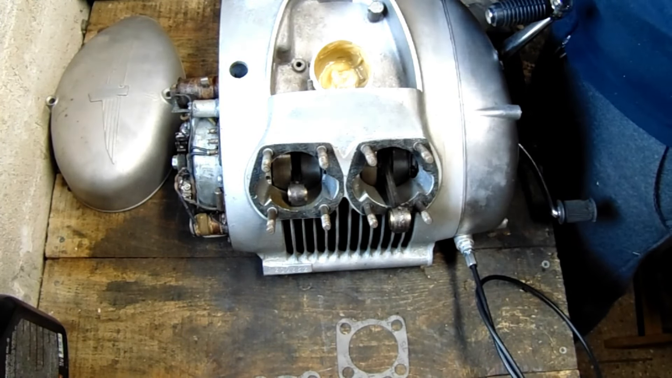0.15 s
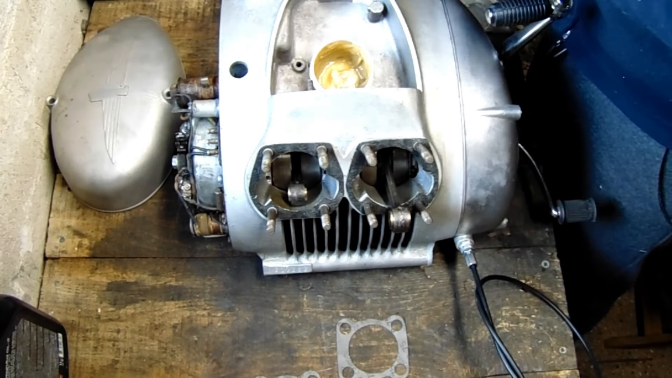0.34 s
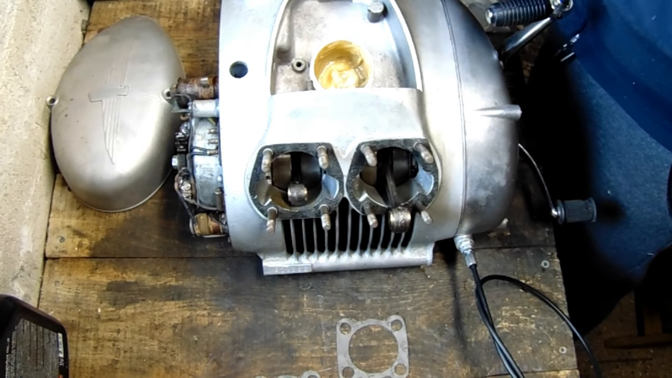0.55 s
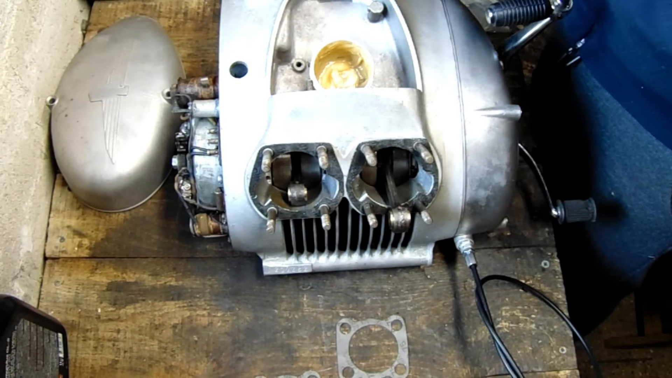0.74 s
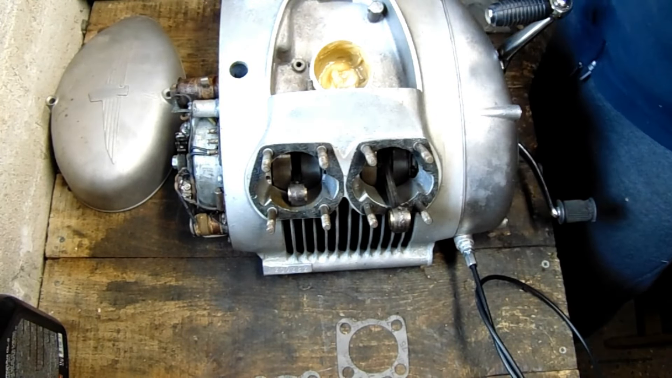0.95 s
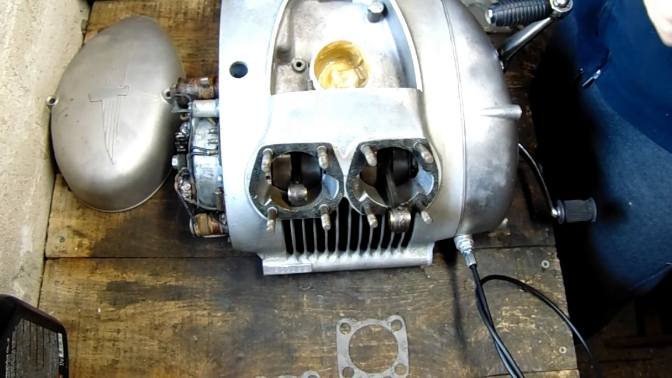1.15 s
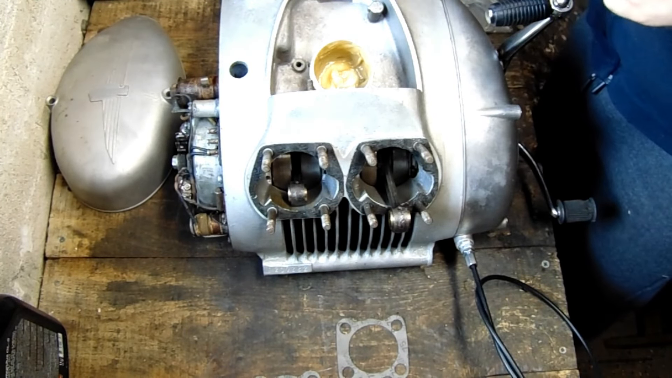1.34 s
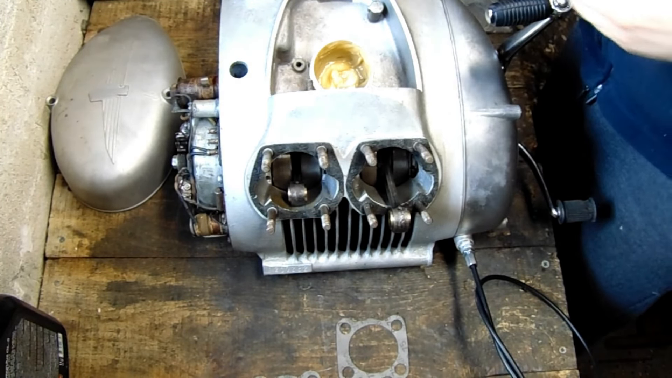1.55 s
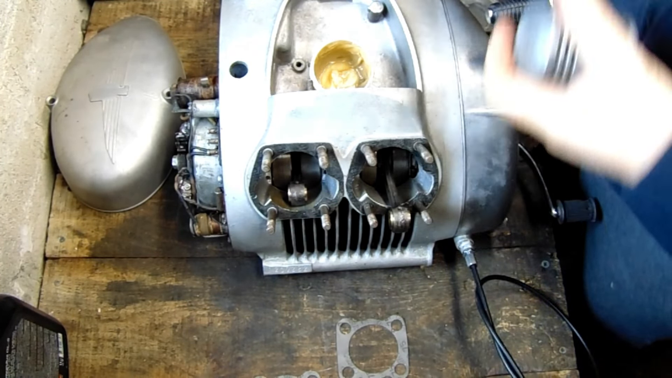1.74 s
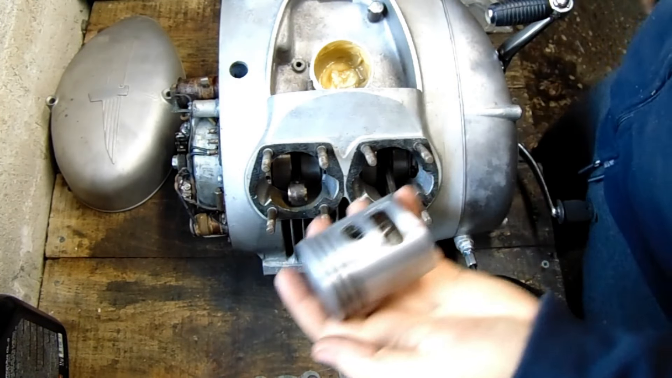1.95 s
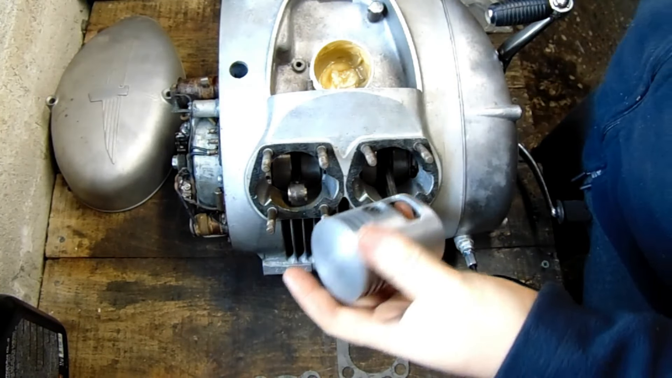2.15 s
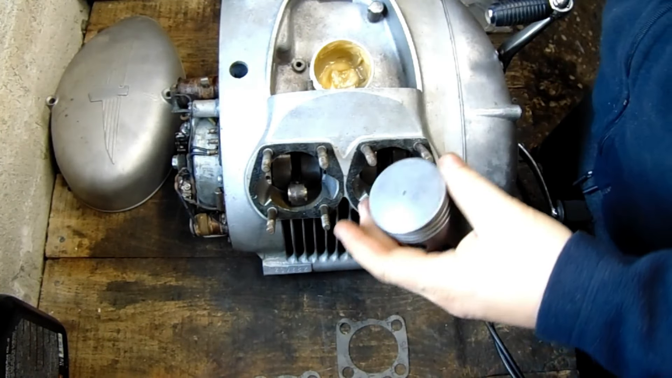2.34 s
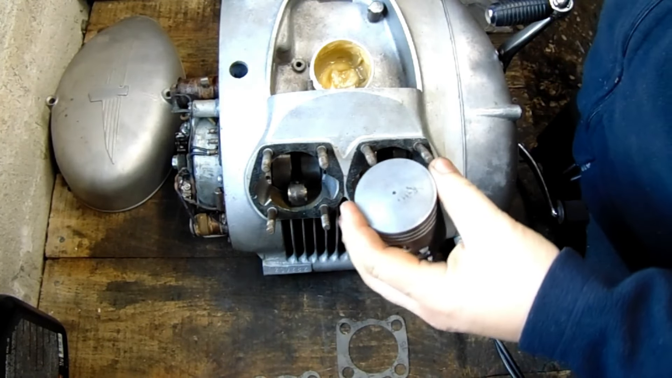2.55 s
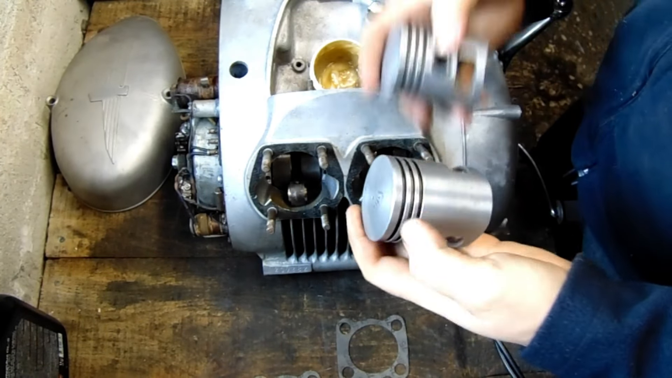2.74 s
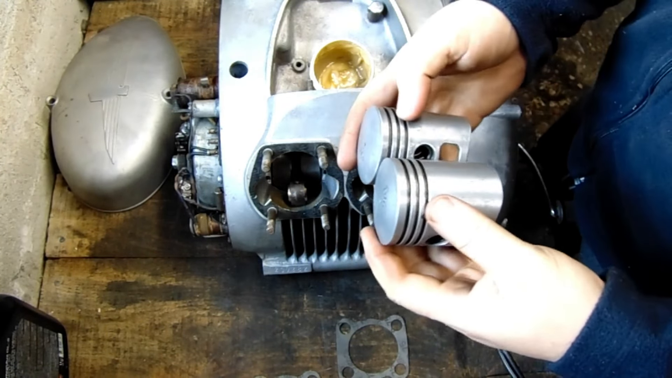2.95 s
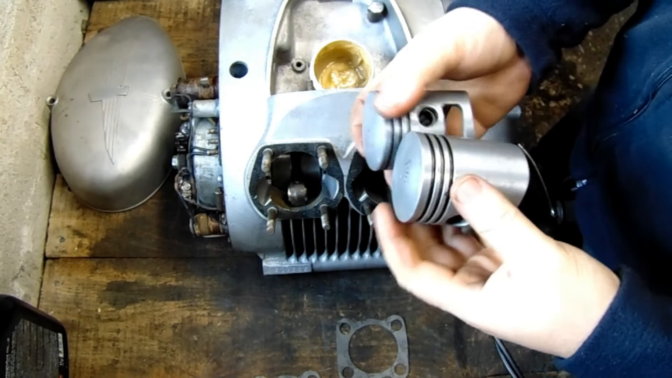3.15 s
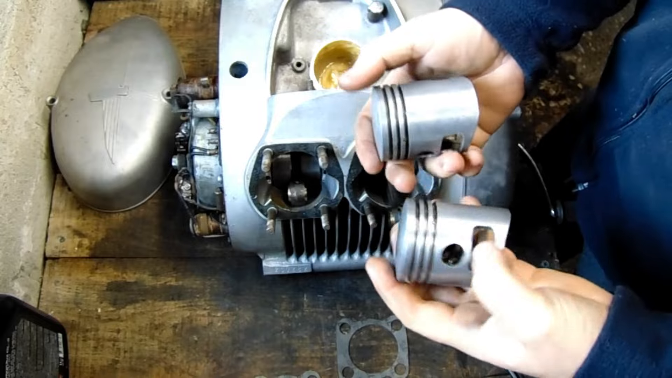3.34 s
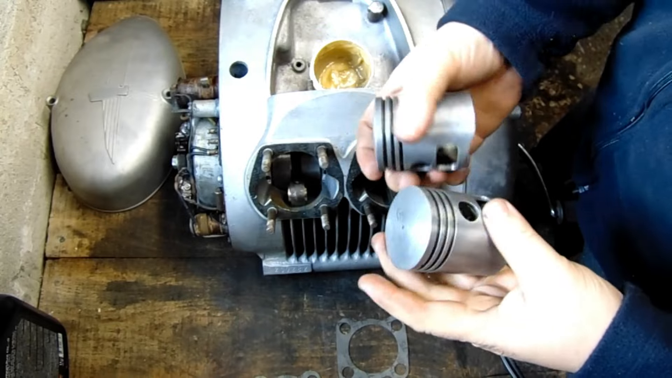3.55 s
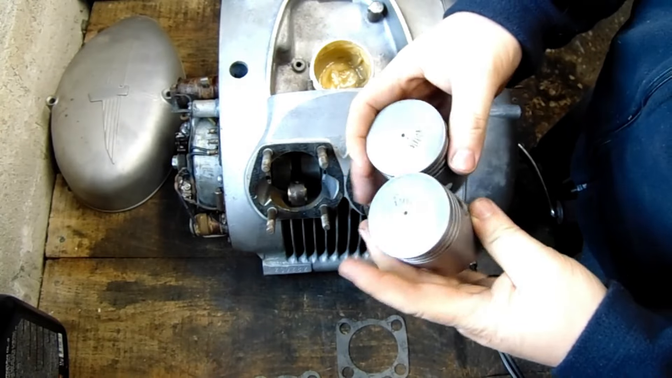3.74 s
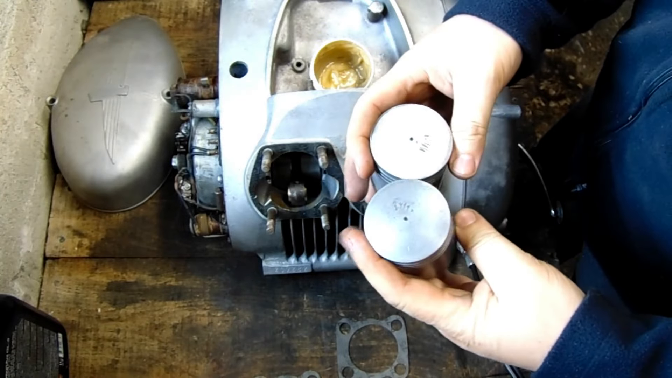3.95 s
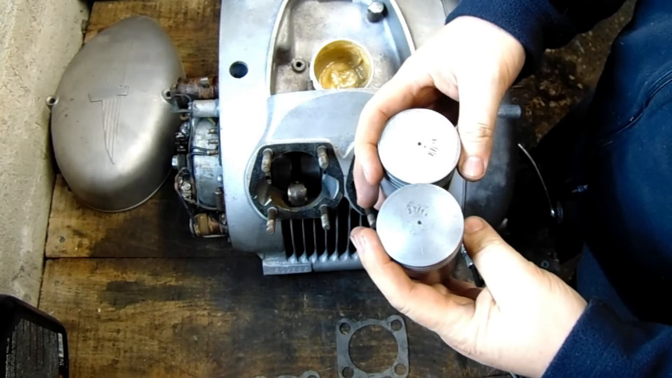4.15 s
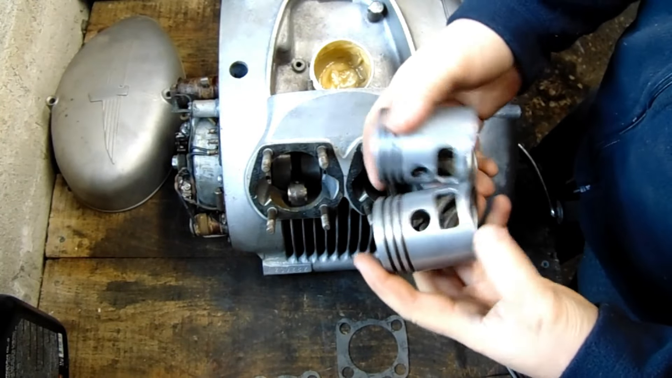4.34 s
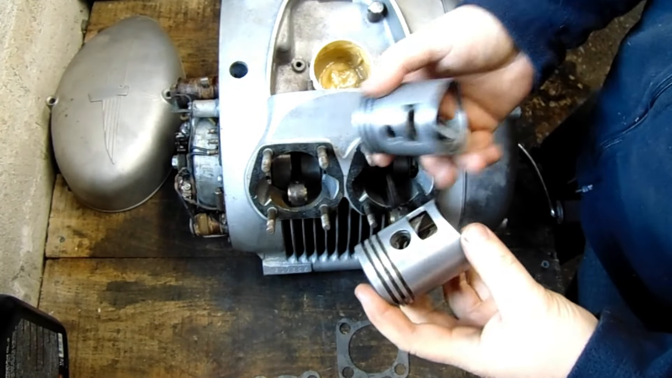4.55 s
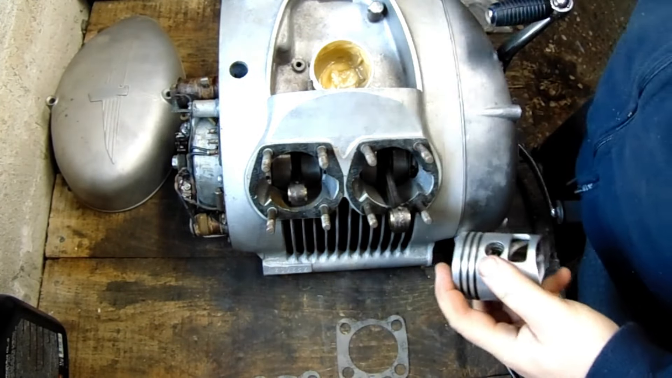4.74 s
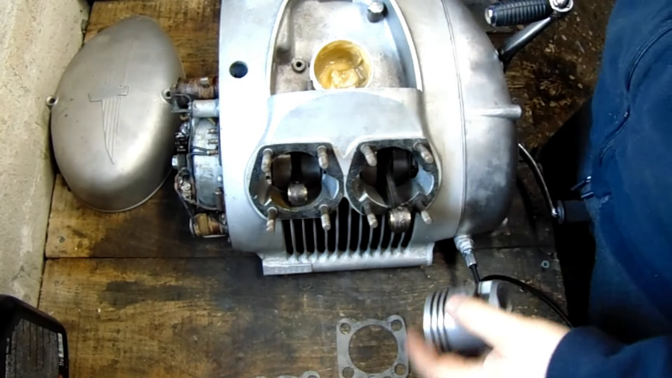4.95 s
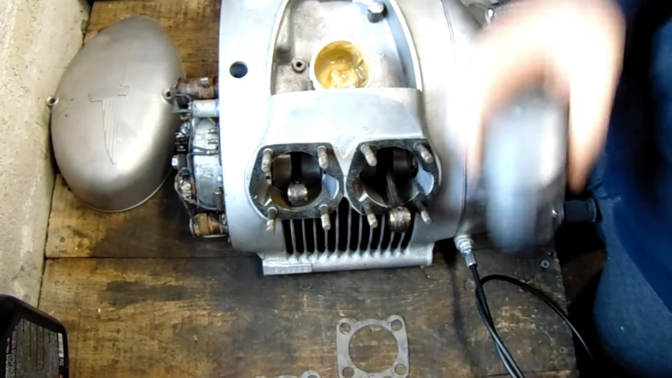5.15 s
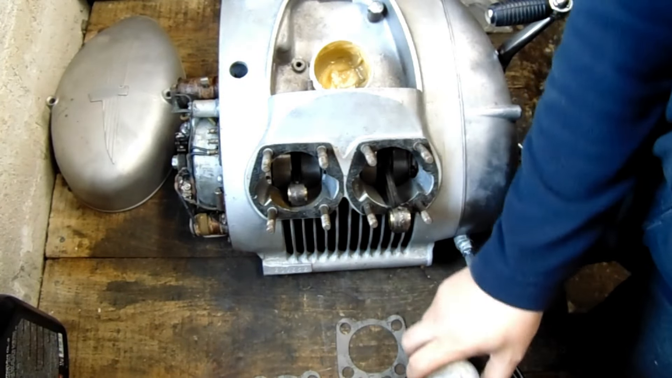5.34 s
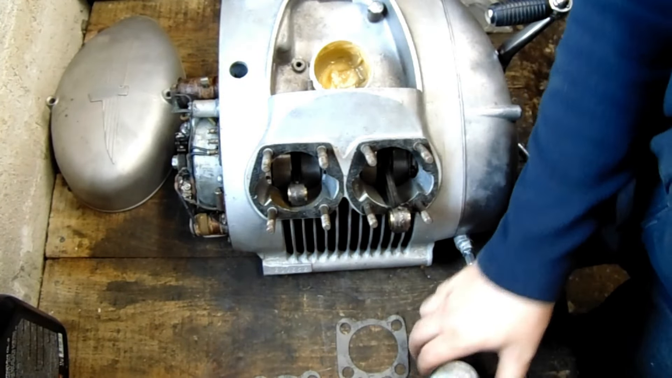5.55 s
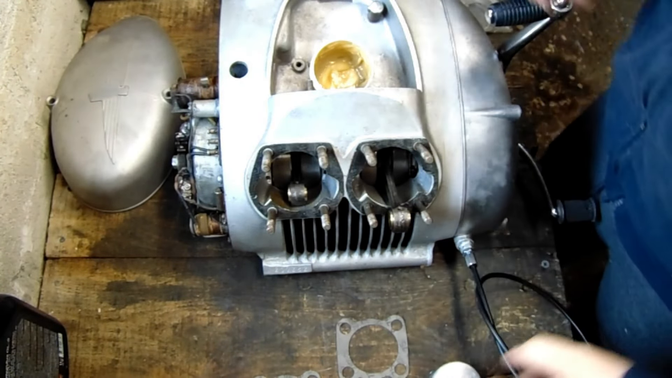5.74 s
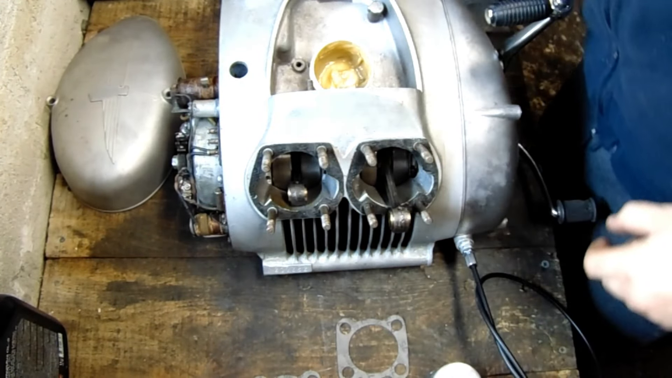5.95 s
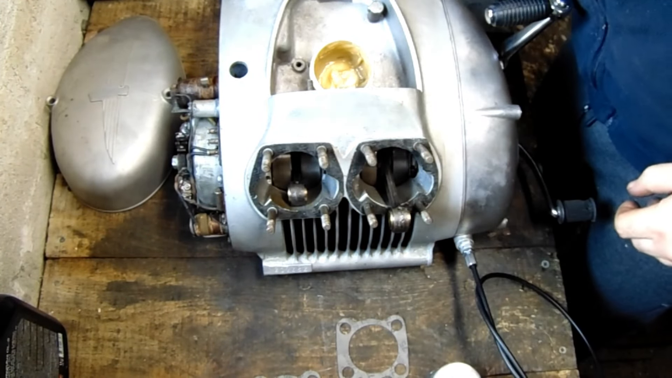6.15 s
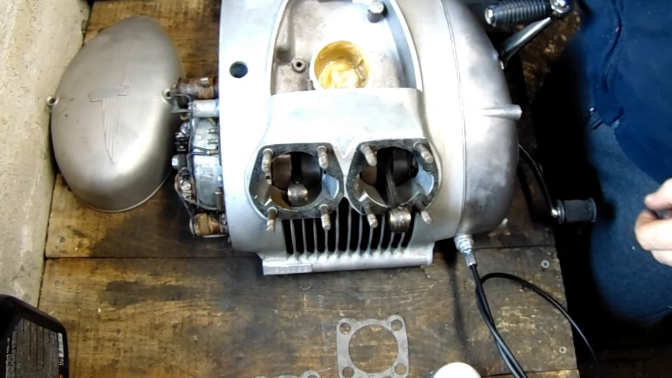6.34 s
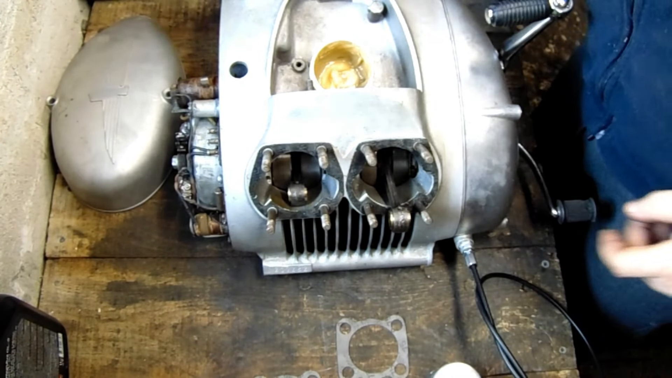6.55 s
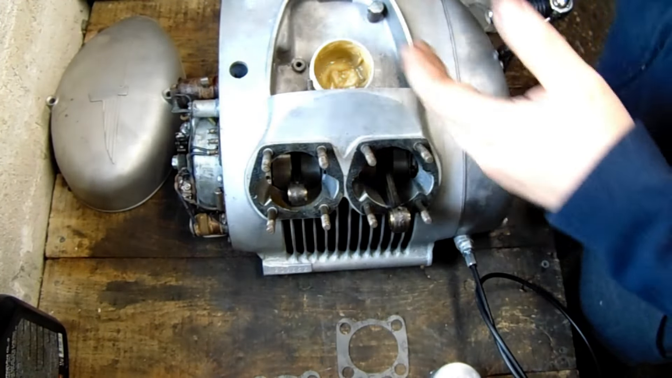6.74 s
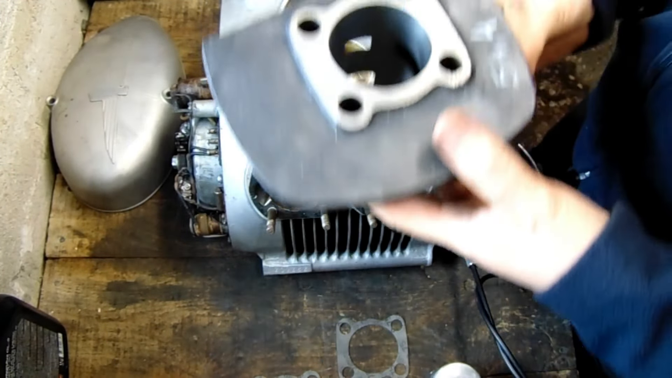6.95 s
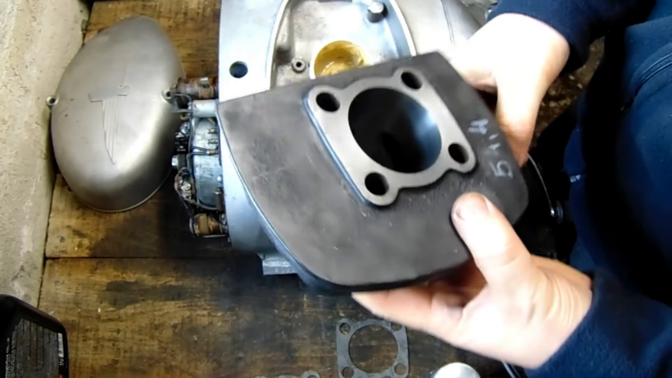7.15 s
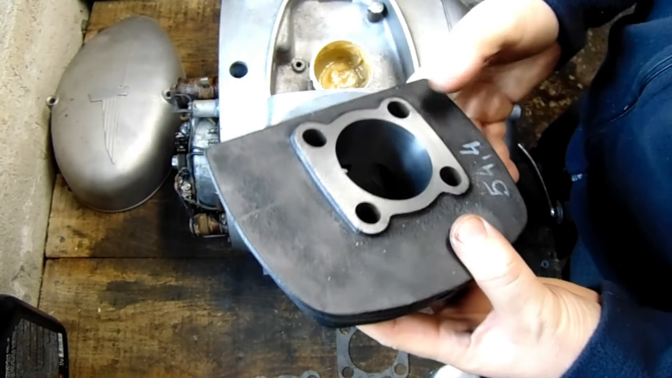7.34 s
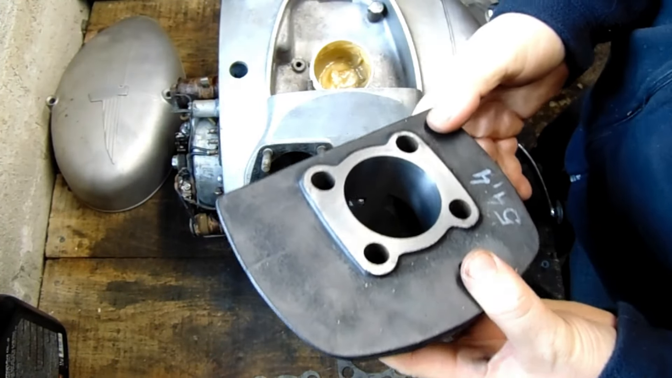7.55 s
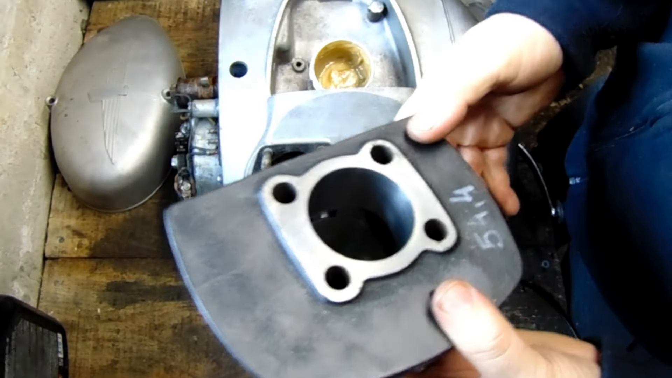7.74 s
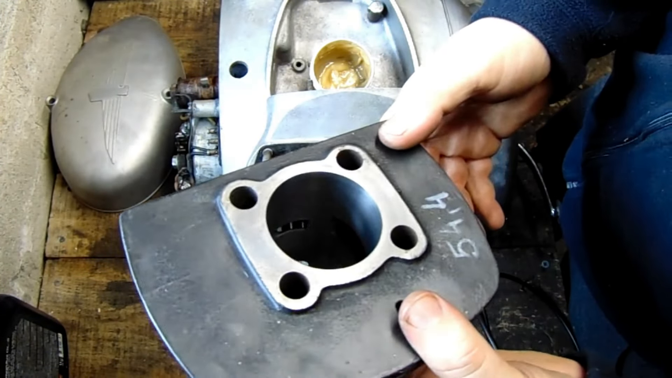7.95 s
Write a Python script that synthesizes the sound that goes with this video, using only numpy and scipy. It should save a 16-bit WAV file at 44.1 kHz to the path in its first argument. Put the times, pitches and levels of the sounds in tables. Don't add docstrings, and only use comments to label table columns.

```python
import sys
import numpy as np
from scipy import signal
from scipy.fft import rfft, irfft, next_fast_len
from scipy.io import wavfile
from scipy.ndimage import uniform_filter1d, map_coordinates

SR = 44100
rng = np.random.default_rng(int(sys.argv[2]) if len(sys.argv) > 2 else 0)


def store_wav(level_fs):
    pcm = np.round(np.clip(np.atleast_2d(level_fs), -1, 1) * 32767)
    wavfile.write(sys.argv[1], SR, pcm.T.astype(np.int16))


def boost_factor(decibels):
    exponent = np.asarray(decibels, float) / 20
    return 10 ** exponent


N = 352359


def unit(x):
    return x / np.sqrt(np.mean(x ** 2) + 1e-20)


def wobble(rate):
    knots = rng.standard_normal(int(N * rate / SR) + 4)
    return map_coordinates(knots, [np.arange(N) * rate / SR])


def filtered(x, response):
    m = next_fast_len(len(x) + 8192)
    return irfft(rfft(x, m) * response(np.fft.rfftfreq(m, 1 / SR)), m)[:len(x)]


def resonances(modes):
    def response(f):
        return sum((-1) ** k * boost_factor(db) * 1j * f * width / (hz * hz - f * f + 1j * f * width)
                   for k, (hz, width, db) in enumerate(modes))
    return response


def ring(modes, t, scatter_db, rough=0):
    total = 0
    for hz, db, t60 in modes:
        strength_db = db + scatter_db * rng.standard_normal()
        walk = rough * np.cumsum(rng.standard_normal(len(t))) / np.sqrt(SR)
        total = total + boost_factor(strength_db - 60 * t / t60) * np.sin(2 * np.pi * hz * t + walk * 0.038 / t60)
    return total


def add(track, s, sound):
    at = track[round(s * SR):][:len(sound)]
    at += sound[:len(at)]


def strokes(rows, cols, attack_s, swell, release_s):
    gain = np.zeros(N)
    for row in rows:
        start, length = row[:2]
        t = np.arange(round((length + 2 * release_s) * SR)) / SR
        rise = np.minimum(t / (attack_s + swell * length), 1)
        level_db = sum(row[c] for c in cols)
        add(gain, start, rise * boost_factor(level_db - 60 * np.maximum(t - length, 0) / release_s))
    return gain


# [t/s, level/dB]
HISS = [
    (0.0, -63),
    (0.18, -67),
    (0.84, -66),
    (1.4, -66.5),
    (3.85, -67.5),
    (3.96, -72),
    (4.21, -71),
    (4.4, -69),
    (5.32, -66.5),
    (7.99, -68),
]
# [f/Hz, level/dB per Hz]
HISS_COLOUR = [(15, -37), (25, -1.5), (43, -10), (76, -3.5), (200, -10), (406, -11), (1890, -17),
               (14200, -25.5)]
# [t/s, length/s, level/dB]
DRONE = [(.1, 0.2, -74), (.5, 0.31, -71), (1.6, 0.22, -69), (1.85, 0.2, -70), (2.4, 0.37, -73),
         (3.1, 0.32, -75), (3.85, 0.26, -78), (4.4, 0.13, -73.5), (4.85, 0.59, -64.5), (5.6, 0.34, -75.5),
         (6, 0.22, -72), (6.64, 0.18, -66.5), (6.96, 0.15, -70.5), (7.45, 0.3, -69), (7.86, .2, -67.5)]
# [t/s, length/s, level/dB]
CREAKS = [(.55, 0.34, -81), (.85, 0.156, -69), (1.62, 0.13, -82), (2.2, .4, -77), (2.64, 0.089, -74),
          (3.1, 0.36, -77), (4.22, 0.52, -75), (4.8, 0.34, -67.5), (5.2, .2, -74.5), (5.5, 0.45, -61.5),
          (6.4, 0.25, -71), (6.95, 0.21, -70.5), (7.22, 0.23, -66.5), (7.5, 0.22, -66.5),
          (7.72, 0.21, -63.5)]


def floor():
    hz, db = np.transpose(HISS_COLOUR)
    hiss = filtered(rng.standard_normal(N), lambda f: boost_factor(np.interp(np.log(f + 1), np.log(hz), db)))
    drone = np.sin(2 * np.pi * np.cumsum(76 + 1.8 * wobble(8.5)) / SR) * boost_factor(1.6 * wobble(4.5))
    rumble = filtered(rng.standard_normal(N), lambda f: resonances([(165, 150, 0)])(f) ** 2)

    def swell(rows, idle_db):
        return boost_factor(idle_db) + strokes(rows, [2], attack_s=0.049, swell=0.24, release_s=.3)

    lows = swell(DRONE, idle_db=-88.0) * unit(drone)
    lows += boost_factor(-4.5) * swell(CREAKS, idle_db=-83.5) * unit(rumble)
    hiss_db = 4 + 0.43 * wobble(12) + np.interp(np.arange(N) / SR, *np.transpose(HISS))
    return boost_factor(hiss_db) * unit(hiss) + lows


# [t/s, length/s, treble level/dB, body level/dB over the treble]
RUSTLE = [(.005, 0.016, -66, 0.5), (.05, 0.076, -60.5, 0.5), (.222, 0.023, -57, -6), (.26, 0.12, -62, -0.5),
          (.47, 0.099, -58, -4.5), (.64, 0.031, -56, -3.5), (.68, 0.062, -68, 3.5), (.775, 0.029, -63, 0),
          (.886, 0.027, -62, 1.5), (.94, 0.073, -58, -2.5), (3.235, 0.015, -72, 2),
          (3.33, 0.089, -69.5, -14), (5.32, 0.083, -70, 0.5), (7.07, 0.032, -67, -2.5),
          (7.24, 0.042, -67.5, -0.5)]


def sleeves():
    grain = boost_factor(0.93 * wobble(300) + wobble(40))
    treble = filtered(rng.standard_normal(N), lambda f: (f / 4000) ** 2 / (1 + (f / 4000) ** 2))
    body = filtered(rng.standard_normal(N), lambda f: f / (f + 500) / (1 + (f / 4500) ** 2))

    def stroke(cols):
        return strokes(RUSTLE, cols, attack_s=0.0044, swell=0.47, release_s=0.22)

    return grain * (boost_factor(2.5) * stroke([2]) * unit(treble) + boost_factor(3.0) * stroke([2, 3]) * unit(body))


# [t/s, length/s, level/dB]
FOCUS = [
    (.236, 0.12, -56),
    (.392, 0.069, -56.5),
    (.474, 0.11, -54.5),
    (2.54, 0.097, -55.5),
    (2.666, 0.16, -57),
    (4.868, 0.13, -56.5),
    (5.012, .22, -57),
    (7.788, 0.15, -58),
]
# [t/s, peak level/dB]
CATCHES = [
    (2.674, -46),
    (2.7, -51),
    (4.967, -40),
    (7.796, -39.5),
    (7.833, -43),
    (7.881, -35),
    (7.912, -37.5),
]
# [f/Hz, width/Hz, level/dB]
SHELL = [(204.5, 29, -3.5), (309, 4.2, 5), (441, 44, -1), (671, 133, -3.5), (904, 41, 0.5), (1200, 63, 0.5),
         (1710, 35, -7), (2110, 130, -19.5)]


def focus():
    turns = np.cumsum(228 * (1 + 0.0599 * wobble(40))) / SR
    teeth = rng.standard_normal(N) * (0.48 + np.cos(np.pi * turns) ** 4) * boost_factor(1.1 * wobble(45))
    whirr = filtered(teeth, resonances(SHELL))
    bright = filtered(whirr, lambda f: (f / (f + 700)) ** 2)
    run = strokes(FOCUS, [2], attack_s=0.0063, swell=0.018, release_s=0.059)
    ticks = [(s, .002, db - 13.0) for s, db in CATCHES]
    catch = strokes(ticks, [2], attack_s=0.00079, swell=0, release_s=0.035)
    return boost_factor(1.5) * run * unit(whirr) + boost_factor(-2.0) * catch * unit(bright)


def brushed(rows):
    out = np.zeros(N)
    for s, hz, db, length, width_hz in rows:
        mode = resonances([(hz, width_hz, 0)])
        rub = filtered(rng.standard_normal(round(length * SR)), lambda f: mode(f) ** 2)
        add(out, s, boost_factor(db) * unit(rub) * np.hanning(len(rub)) ** 1.2)
    return out


# [t/s, f/Hz, level/dB, length/s, width/Hz]
BUMPS = [
    (0.477, 880, -49, 0.009, 580),
    (4.96, 1140, -72, 0.017, 600),
    (0.715, 680, -61, 0.056, 120),
    (1.259, 100, -57, 0.098, 9),
    (1.519, 550, -60.5, 0.049, 140),
    (2.523, 532, -45.5, 0.039, 160),
    (5.53, 707, -52.5, 0.049, 900),
    (5.783, 227, -58.5, 0.026, 120),
    (6.599, 1200, -61, 0.042, 1120),
]


def bumps():
    return brushed(BUMPS)


# [t/s, peak level/dB, t60/s, tilt/dB an octave]
SCUFFS = [(1.2544, -41.5, 0.14, -3.5), (1.344, -46.5, 0.15, 4), (1.527, -54, 0.075, -3),
          (1.8123, -45, 0.063, -1.5), (2.2898, -54.5, 0.092, -3.5), (2.413, -53.5, 0.073, -3),
          (2.5329, -46.5, 0.075, -6), (2.8153, -57.5, 0.079, -8), (3.679, -54, 0.11, 2),
          (5.8645, -52, 0.061, -2), (6.6594, -57.5, 0.15, -5), (6.7414, -51.5, 0.046, -2.5),
          (6.997, -50.5, 0.087, -1), (7.657, -46.5, 0.06, -2.5)]


def scuffs():
    out, t = np.zeros(N), np.arange(SR // 5) / SR
    for s, db, t60, tilt_db in SCUFFS:
        puff = filtered(rng.standard_normal(len(t)),
                        lambda f: boost_factor(tilt_db * np.log2((f + 400) / 8000)) * f / (f + 400))
        soft_edge = 1 - np.exp(-(t / (0.068 * t60)) ** 2)
        add(out, s - .085 * t60, boost_factor(db - 60 * t / t60) * soft_edge * puff)
    return out


# [t/s, f/Hz, level/dB, length/s]
PINGS = [(1.243, 4240, -48, 0.042), (1.249, 5900, -62, 0.031), (1.528, 11800, -69, .05),
         (1.533, 13200, -69, .03), (1.968, 13000, -75, .07), (2.454, 7200, -73, 0.055),
         (2.522, 8060, -64, 0.034), (2.525, 11800, -61, 0.024), (2.677, 11800, -64.5, 0.07),
         (3.15, 3090, -67, .025), (3.287, 11800, -70, 0.099), (4.324, 7390, -67, .02),
         (4.376, 4650, -58, 0.017), (4.387, 4360, -56, .018), (4.4, 3980, -59, .018),
         (3.34, 12900, -73.5, 0.05), (3.45, 11800, -75, 0.077), (3.69, 13200, -67, .04),
         (5.584, 11800, -66, 0.042), (5.585, 15800, -60.5, .05), (6.329, 3300, -69, .03),
         (6.336, 4200, -76, 0.036), (6.328, 11650, -73.5, 0.03), (6.438, 5900, -54.5, 0.032),
         (6.444, 12000, -62.5, .02), (6.502, 4936, -59, 0.033), (6.506, 3090, -55, 0.067),
         (6.601, 3440, -81.5, 0.04), (6.993, 3210, -65, 0.054), (6.985, 7950, -65, 0.044),
         (6.982, 6350, -69, .03), (7.076, 8000, -71.5, 0.046), (7.228, 2720, -61.5, 0.099),
         (7.237, 6140, -75.5, 0.031), (7.311, 2606, -69.5, 0.07)]


def pings():
    return brushed([(*row, 36 + 0.016 * row[1]) for row in PINGS])


# [t/s, f/Hz, level/dB, length/s, width/Hz]
TINGS = [(1.805, 4610, -61, 0.035, 60), (1.808, 7300, -61, 0.024, 90), (1.808, 13200, -58, .02, 120),
         (1.252, 5870, -60, .025, 80), (1.334, 9700, -63, 0.025, 150), (1.334, 12400, -64, .028, 200),
         (3.056, 8100, -42, .018, 900), (6.452, 3010, -56, .04, 249.7), (6.528, 1780, -58.5, 0.044, 120),
         (6.988, 7730, -64, .03, 250), (6.988, 9740, -66, .025, 200), (6.99, 12000, -64, .03, 500),
         (7.238, 6100, -68.5, .05, 30), (4.345, 11800, -56, .025, 200), (4.378, 4650, -56, .015, 200)]


def glints():
    return brushed(TINGS)


# [f/Hz, level/dB, t60/s]
BOOM = [(100, 11, 0.2), (172, -10, 0.096)]


def bench(blows, modes, thud_hz, thud_db, attack_s, click_modes, click_s, rough):
    out, t = np.zeros(N), np.arange(SR // 3) / SR
    for s, db, boom_db, click_db in blows:
        thud = filtered(boost_factor(-60 * t / 0.13) * rng.standard_normal(len(t)),
                        lambda f: 1 / (1 + 1j * f / thud_hz) ** 3 * f / (f + 200))
        plank = ring(modes, t, scatter_db=0.9, rough=rough) * (1 - np.exp(-t / attack_s))
        wood = boost_factor(thud_db) * thud / np.abs(thud).max() + boost_factor(-0.5) * plank
        boom = ring(BOOM, t, scatter_db=2.8) * (1 - np.exp(-t / 0.0064))
        click = filtered(boost_factor(-60 * t / click_s) * rng.standard_normal(len(t)), resonances(click_modes))
        click *= boost_factor(click_db) / np.abs(click).max()
        add(out, s, boost_factor(db) * (wood + boost_factor(boom_db + 2.0) * boom + click))
    return out


# [t/s, peak level/dB, boom level/dB, click level/dB]
SETDOWN = [
    (1.254, -58.5, 4.5, 19),
    (1.548, -60, -15, -12),
    (2.534, -53.5, -6, -16),
    (5.593, -10, -26.5, -40.5),
    (5.5965, -31.5, -36, 2),
    (5.609, -33, -30, -28),
    (5.794, -60, -13.5, -7),
    (5.88, -64, -2.5, -12),
    (5.905, -73, -11, -15),
]
# [f/Hz, level/dB, t60/s]
PLANK = [(152.7, -11.5, 0.08), (252.4, -1.5, 0.028), (363, 6, 0.03), (531.5, 5.5, 0.021),
         (672, -24.5, 0.12), (602, -20.5, 0.28), (843, -3, 0.022), (814, -36.5, 0.22), (944, -23.5, 0.22),
         (1083, -12, 0.061), (1324, -21.5, 0.04), (1712, -29, 0.21), (2040, -28.5, 0.17),
         (2790, -29, 0.074)]
# [f/Hz, width/Hz, level/dB]
GRIT = [(2470, 1100, 19), (9000, 9500, -2.5)]


def setdown():
    return bench(SETDOWN, PLANK, thud_hz=1485, thud_db=-8.5, attack_s=0.00067,
                 click_modes=GRIT, click_s=0.017, rough=3.2)


# [f/Hz, level/dB, t60/s]
SKIRT = [(4586, 1.5, .042), (4668, -8, .04), (4365, -13, .035), (5716, -16, .03), (4588, -27, .15)]
CROWN = [(11822, 0, .075), (11700, -13, .04), (15650, -7, .06)]
# [f/Hz, width/Hz, level/dB]
UPPER = [(5900, 290, -16), (6695, 180, 8), (7800, 400, -0.5), (9750, 1600, -10), (12400, 1800, -7.5)]
# [f/Hz, width/Hz, level/dB]
BODY = [(391.4, 180, -6.5), (860, 140, -8.5), (2850, 2600, 0)]


def pistons(contacts, wall_modes, land, crack_s, snap, broad_db, upper_db, body=BODY):
    out, t = np.zeros(N), np.arange(SR // 6) / SR

    def walls(f):
        blur = sum(resonances([mode])(f) for mode in body)
        return resonances(wall_modes)(f) + boost_factor(upper_db) * resonances(UPPER)(f) + boost_factor(broad_db) * blur

    for s, db, skirt_db, land_db, crown_db in contacts:
        crackle = boost_factor(-60 * t / crack_s) * rng.standard_normal(len(t))
        wall = filtered(crackle + snap * (t == 0), walls)
        add(out, s, boost_factor(db) * wall / np.abs(wall).max())
        for modes, level_db in ((SKIRT, skirt_db), (land, land_db), (CROWN, crown_db)):
            rings = ring(modes, t, scatter_db=1.5) * (1 - np.exp(-t / 0.00048))
            add(out, s, boost_factor(level_db + 1.5) * rings)
    return out


# [t/s, clack peak level/dB, skirt level/dB, ring-land level/dB, crown level/dB]
FIRST = [
    (1.812, -66, -57, -65, -55.5),
    (3.0112, -14.5, -32, -28, -21),
    (3.0142, -19.5, -36.5, -25.5, -23),
]
SECOND = [
    (3.0605, -22.5, -29, -45, -42.5),
    (3.0632, -14.5, -24.5, -42.5, -41),
]
THIRD = [
    (3.8835, -6, -13.5, -26.5, -45),
]
# [f/Hz, width/Hz, level/dB]
FIRST_WALL = [(1460, 49, -4), (1796, 78, -0.5), (2146, 31, 2), (2340, 54, -3.5), (2520, 20, -2.5),
              (2680, 22, -4), (2965, 140, -17), (3510, 51, -0.5), (3850, 31, -5)]
SECOND_WALL = [(1450, 42, -5), (1780, 55, -1), (2160, 93, -8), (2518, 35, 2.5), (2620, 41, -4),
               (3126, 104, 7.5), (3445, 85, 2), (3750, 98, 0.5), (4140, 28, -13)]
THIRD_WALL = [(1541, 33, -4.5), (1835, 39, -13), (2160, 86.6, -4), (2400, 17, -5.5), (2610, 64, 3.5),
              (2930, 55, -3), (3384, 120, -11), (3730, 160, -4), (4020, 22, -4.5)]
# [f/Hz, width/Hz, level/dB]
THIRD_BODY = [(560, 288, -10), (900, 373, -6.5), (2620, 2400, 3)]
# [f/Hz, level/dB, t60/s]
LAND = [(7290, 0, .045), (7400, -2, .045), (7527, -7, .045), (7860, -9, .035)]


def clinks():
    first = pistons(FIRST, FIRST_WALL, LAND, crack_s=0.035, snap=7.3, broad_db=-11.0, upper_db=-6.5)
    second = pistons(SECOND, SECOND_WALL + [(8220, 690, -7.5)], LAND,
                     crack_s=.014, snap=18, broad_db=-7, upper_db=-16.5)
    third = pistons(THIRD, THIRD_WALL, LAND,
                    crack_s=0.013, snap=9.4, broad_db=-4.5, upper_db=-17, body=THIRD_BODY)
    return first + second + third


# [t/s, clack peak level/dB, skirt level/dB, ring-land level/dB, crown level/dB]
RATTLE = [
    (1.826, -50.5, -55, -66, -66),
    (4.3475, -41, -66, -70, -75),
    (4.3525, -40, -62, -70, -70),
    (4.3555, -38, -60, -68, -68),
    (4.3685, -41, -62, -68, -72),
    (4.3925, -43, -62, -66, -78),
    (4.3985, -47, -62, -64, -78),
    (4.4035, -45, -66, -66, -78),
    (4.4165, -47, -70, -65, -78),
]
# [f/Hz, width/Hz, level/dB]
GRIPPED = [(1460, 228, 3.5), (2175, 280, 4), (2524, 180, 4), (3010, 140, 1.5), (3550, 170, -3),
           (4540, 350, -15), (7280, 120, -19), (8120, 300, -16.5), (11800, 300, -33.5)]
# [f/Hz, level/dB, t60/s]
HELD_LAND = [(7395, 0, .06), (7290, -4, .05)]


def chatter():
    return pistons(RATTLE, GRIPPED, HELD_LAND, crack_s=0.012, snap=13, broad_db=-13.5, upper_db=-25)


# [t/s, level/dB]
RIM_RINGS = [
    (3.0118, -30),
    (3.0149, -24),
    (3.062, -29),
    (3.884, -36),
    (4.3802, -67),
    (4.4352, -62),
    (4.4744, -62),
]
# [f/Hz, level/dB, t60/s]
RIM = [(13058, 0, .055), (13229, -5, .04)]


def rims():
    out, t = np.zeros(N), np.arange(SR // 8) / SR
    for s, db in RIM_RINGS:
        add(out, s, boost_factor(db) * ring(RIM, t, scatter_db=0.5) * (1 - np.exp(-t / 0.00058)))
    return out


# [t/s, clack peak level/dB, skirt level/dB, ring-land level/dB, crown level/dB]
TOUCHES = [(4.0078, -41.5, -71, -81, -85.5), (4.116, -43.5, -87, -61, -88),
           (4.1823, -41.5, -75.5, -87, -86), (4.339, -37, -51, -65, -71), (4.3428, -38, -55, -69.5, -75),
           (4.3622, -38.5, -56, -70, -69), (4.3804, -34.5, -48, -48.5, -75), (4.4102, -37.5, -71, -64, -75),
           (4.4345, -34, -64, -45, -66), (4.4744, -64, -72, -50.5, -62), (4.5157, -59, -71, -64, -61)]


def touches():
    return pistons(TOUCHES, GRIPPED, HELD_LAND, crack_s=0.0333, snap=5.8, broad_db=-16.5, upper_db=-25)


# [t/s, length/s, level/dB]
SCRAPE = [
    (4.336, 0.0324, -48.5),
    (4.388, 0.021, -48),
]
# [t/s, length/s, level/dB]
SKIM = [
    (4.342, 0.023, -47.5),
    (4.382, .03, -67.5),
    (4.436, 0.02, -62),
    (4.472, 0.0195, -60.5),
    (4.512, .012, -63.5),
]


def scrape():
    grit = rng.standard_normal((2, N)) * boost_factor(1.8 * wobble(1100))
    high = resonances([(4650, 260, 1.5), (8200, 390, 4.5), (10130, 310, -13),
                       (11800, 250, 2.0), (13390, 1200, -7), (15590, 180, 3.5)])

    def roll(rows):
        return strokes(rows, [2], attack_s=.004, swell=0.2, release_s=0.048)

    skirts = roll(SCRAPE) * unit(filtered(grit[0], resonances(GRIPPED)))
    return skirts + roll(SKIM) * unit(filtered(grit[1], high))


# [t/s, level/dB]
SHUDDER = [
    (5.592, -74.5),
    (6.44, -41),
]
# [f/Hz, level/dB, t60/s]
LEGS = [(42, -2.5, .25)]


def shudder():
    out, t = np.zeros(N), np.arange(SR // 3) / SR
    for s, db in SHUDDER:
        add(out, s, boost_factor(db) * ring(LEGS, t, scatter_db=0.5) * (1 - np.exp(-t / .01)))
    return out


# [t/s, length/s, level/dB]
SHORT_DRAGS = [
    (6.142, 0.014, -62.5),
]
LONG_DRAGS = [
    (6.15, 0.1144, -67.5),
]
# [f/Hz, width/Hz, level/dB]
SHORT_FIN = [(3090, 160, 3), (4240, 290, -6), (8740, 97, 1), (11800, 104, -3)]
LONG_FIN = [(2000, 130, -7), (2606, 50, -2), (5530, 86, -9.5), (7970, 66, -8.5), (13660, 60, -4)]


def fins():
    long = unit(filtered(rng.standard_normal(N), lambda f: resonances(LONG_FIN)(f) ** 2))
    short = unit(filtered(rng.standard_normal(N), lambda f: resonances(SHORT_FIN)(f) ** 2))

    def drag(rows):
        return strokes(rows, [2], attack_s=0.0055, swell=0.49, release_s=0.23)

    return boost_factor(4.5) * (drag(LONG_DRAGS) * long + drag(SHORT_DRAGS) * short)


# [t/s, length/s, level/dB, low fin level/dB, treble level/dB]
CLATTER = [
    (6.41, 0.047, -58.5, -12.5, -3),
    (6.439, 0.0091, -53, -22, 2.5),
    (6.46, 0.026, -67, -19, 0.5),
    (6.498, 0.028, -58, -0.5, -1.5),
    (6.53, 0.0097, -64, 10.5, -24),
]
# [f/Hz, width/Hz, level/dB]
CLANG = [(2950, 62, 9), (3300, 66, 4), (3680, 310, -3.5), (4900, 260, -0.5), (5750, 450, -3)]


def clatter():
    grit = rng.standard_normal((3, N)) * boost_factor(2.8 * wobble(900))
    low = resonances([(1730, 670, 0)])
    high = resonances([(8600, 2500, -5.5), (11700, 500, -0.5), (12770, 1300, -3.5)])
    out = np.zeros(N)
    for noise, response, cols in zip(grit, (resonances(CLANG), low, high), ([2], [2, 3], [2, 4])):
        gain = strokes(CLATTER, cols, attack_s=0.0023, swell=0.14, release_s=0.084)
        out += gain * unit(filtered(noise, response))
    return out


# [t/s, peak level/dB, boom level/dB, click level/dB]
LIFT = [
    (6.4372, -29, 1.5, -24),
    (6.444, -18, -33, -26.5),
    (6.4525, -26, -4.5, -23),
    (6.508, -34.5, -9.5, -16),
    (6.519, -37, -24, -17),
    (6.535, -43.5, -18, -18),
    (6.61, -59.5, -15, 3),
]
# [f/Hz, level/dB, t60/s]
BOARD = [(245, -1, 0.039), (327, 6.5, 0.062), (426, -3.5, 0.031), (478, -6, 0.04), (587, -18, 0.1),
         (686, -20, 0.05)]


def lift():
    return bench(LIFT, BOARD, thud_hz=401, thud_db=-16.5, attack_s=0.002,
                 click_modes=CLANG, click_s=0.11, rough=2.9)


def room(x, t60):
    t = np.arange(SR // 3) / SR
    tail = filtered(rng.standard_normal(len(t)) * boost_factor(-60 * t / t60), lambda f: 1 / (1 + f / 2500))
    return signal.fftconvolve(x, np.pad(tail, (200, 0)) / np.linalg.norm(tail))[:N]


def scene():
    alloy = clinks() + rims() + touches() + scrape()
    wood = setdown() + clatter() + lift()
    hits = filtered(alloy, lambda f: (1j * f / (300 + 1j * f)) ** 2)
    hits += filtered(wood, lambda f: (1j * f / (80 + 1j * f)) ** 3)
    background = floor() + sleeves() + focus()
    handling = bumps() + scuffs() + pings() + glints() + chatter() + shudder() + fins()
    return (hits + boost_factor(-16.0) * room(hits, t60=0.082) + background + handling)[None]


# [t/s, level/dB against the span]
SPREADS = [(1.237, -9), (1.803, -5), (2.519, -11), (2.985, -10), (3.045, -8), (3.859, -3.5), (4.099, -10),
           (4.321, -11), (4.454, -8), (4.501, -4.5), (5.57, -10.5), (6.409, -6.5), (6.491, 4)]


def smear(clean):
    x, sine = clean.copy(), np.sin(np.pi * (np.arange(2048) + .5) / 2048)
    hz = np.fft.rfftfreq(2048, 1 / SR)
    for s, db in SPREADS:
        frame = clean[round(s * SR):][:2048] * sine
        lines, blow = np.abs(rfft(frame)), uniform_filter1d(np.abs(frame), size=200)
        spread = 1 - 0.74 * blow / blow.max()
        bass_cut = hz ** 2 / (hz ** 2 + 596 ** 2)
        noise = irfft(lines * bass_cut * np.exp(2j * np.pi * rng.random(len(lines))))
        lumps = uniform_filter1d(np.abs(noise), size=100, mode='wrap')
        evened = noise * (lumps.mean() / lumps) ** 0.65
        add(x, s, boost_factor(db + 8) * spread * sine ** 1.8 * evened)
    return x


def low_pass(x):
    return signal.sosfilt(signal.butter(12, 15770, fs=SR, output="sos"), x)


def record(dry):
    x = smear(dry[0])
    x = filtered(x, lambda f: np.where(f < 14250, 1, boost_factor(-18.0)) * (f < 15780))
    return low_pass(x[None])


dry = scene()
out = record(dry)
store_wav(out)
```